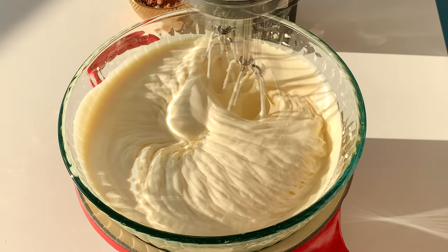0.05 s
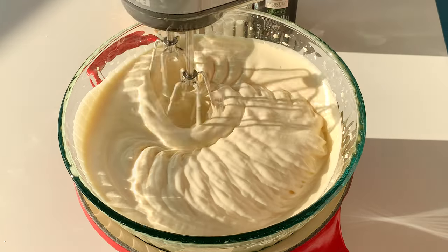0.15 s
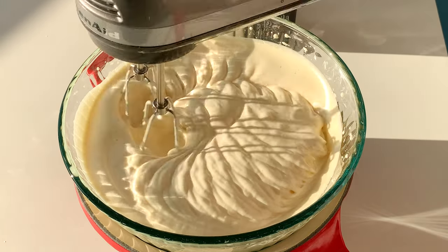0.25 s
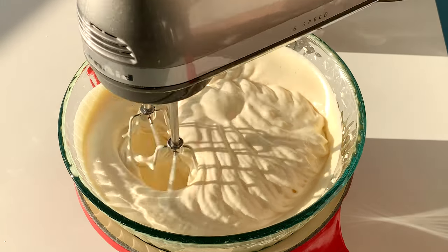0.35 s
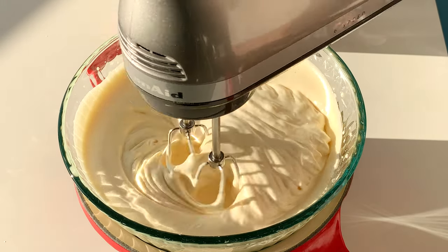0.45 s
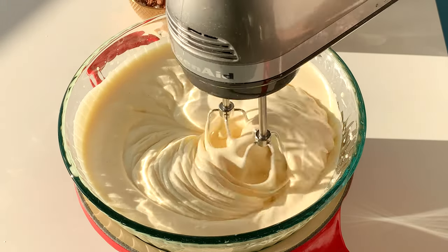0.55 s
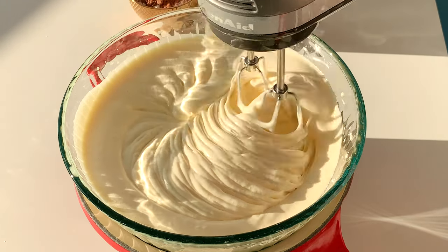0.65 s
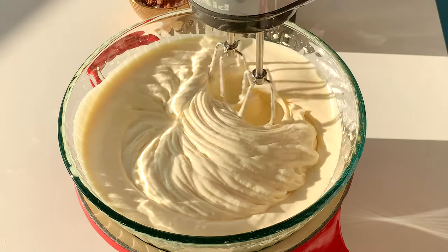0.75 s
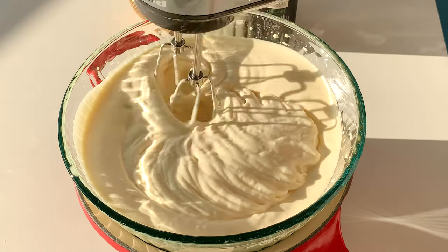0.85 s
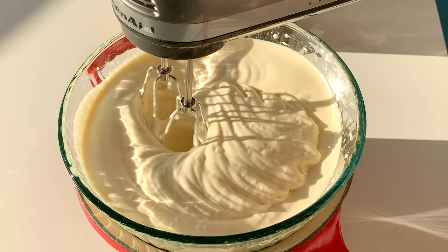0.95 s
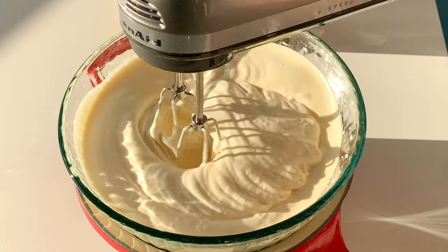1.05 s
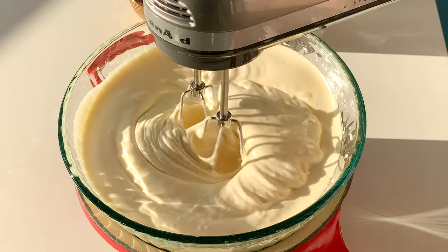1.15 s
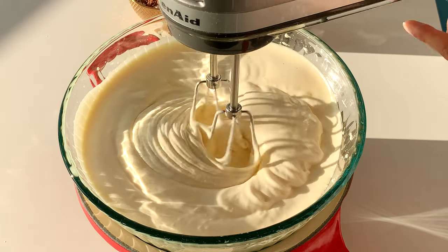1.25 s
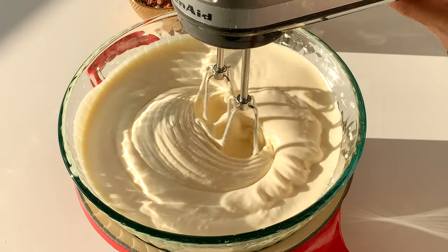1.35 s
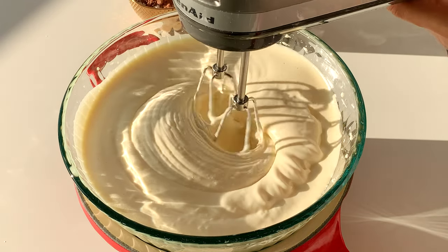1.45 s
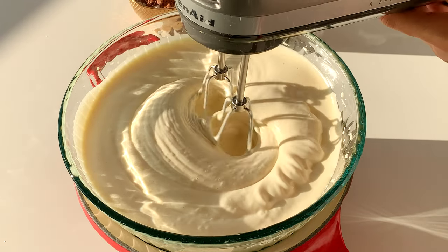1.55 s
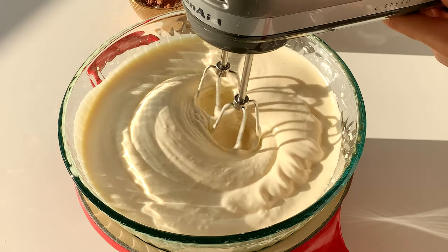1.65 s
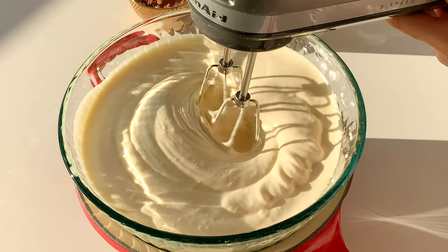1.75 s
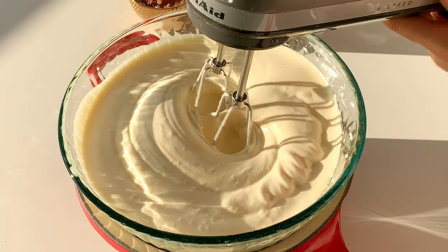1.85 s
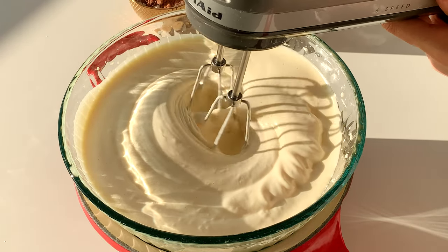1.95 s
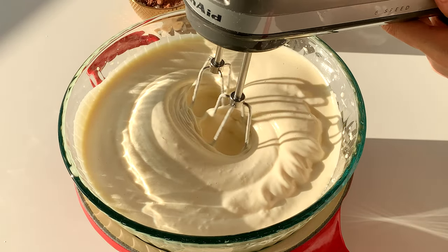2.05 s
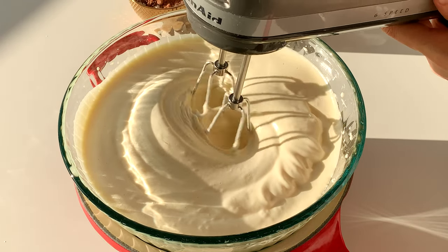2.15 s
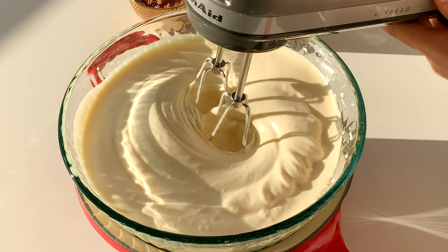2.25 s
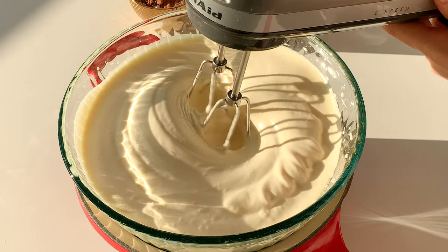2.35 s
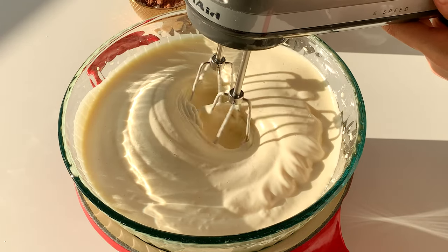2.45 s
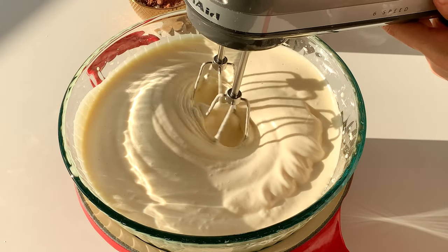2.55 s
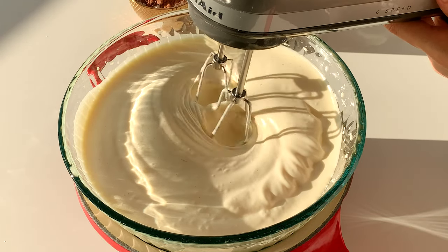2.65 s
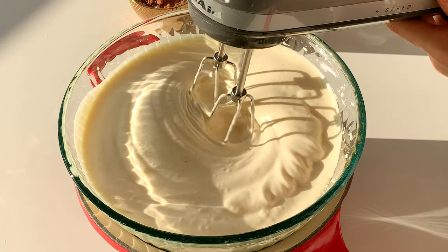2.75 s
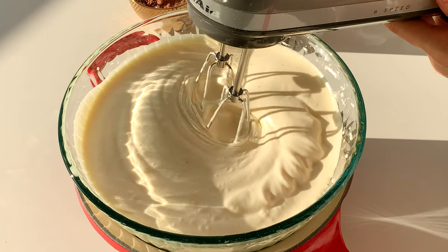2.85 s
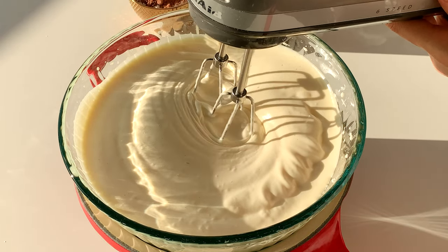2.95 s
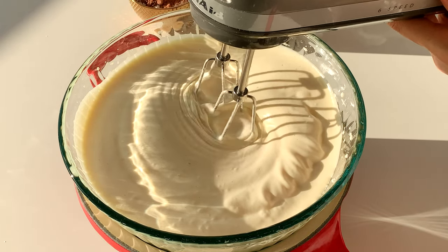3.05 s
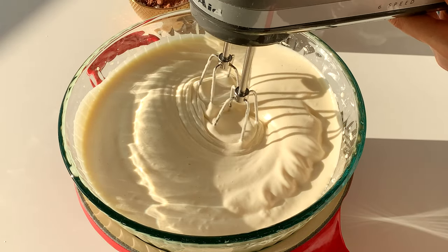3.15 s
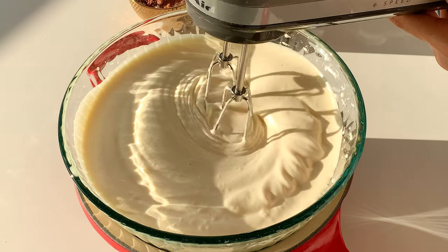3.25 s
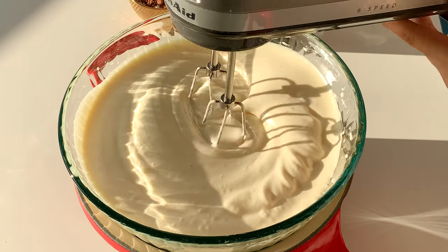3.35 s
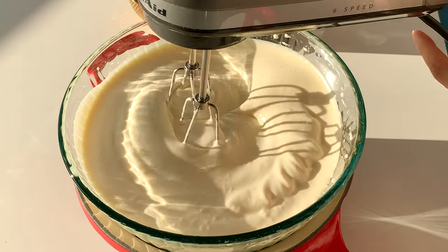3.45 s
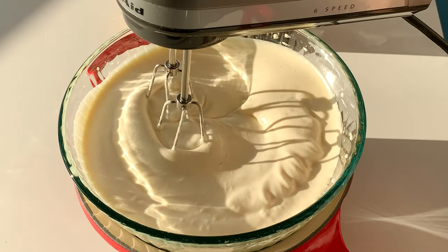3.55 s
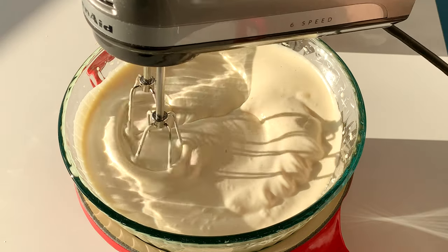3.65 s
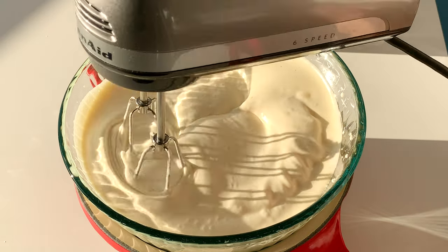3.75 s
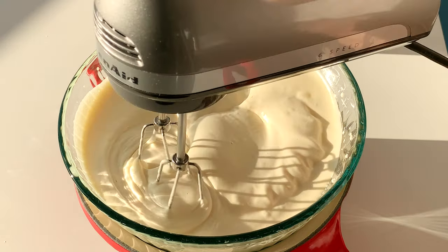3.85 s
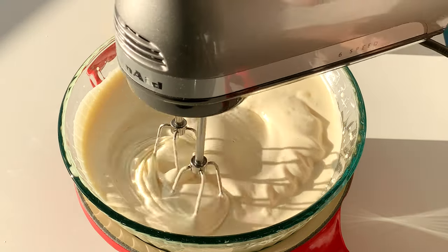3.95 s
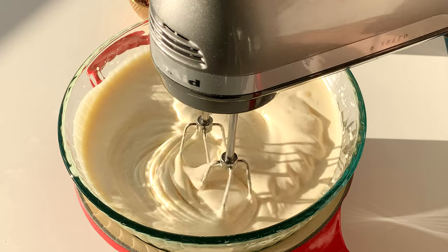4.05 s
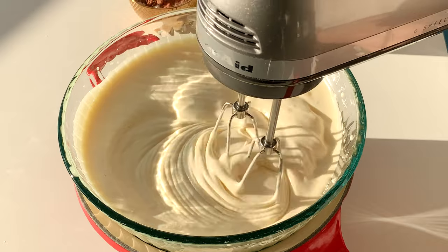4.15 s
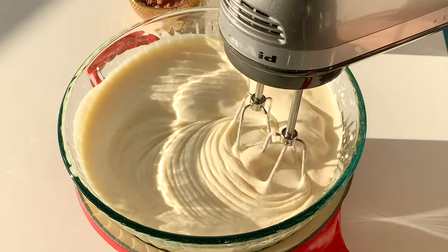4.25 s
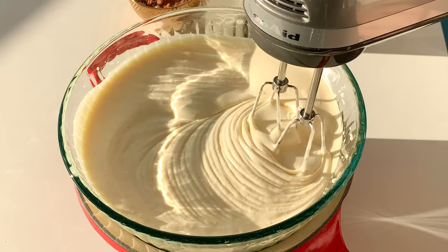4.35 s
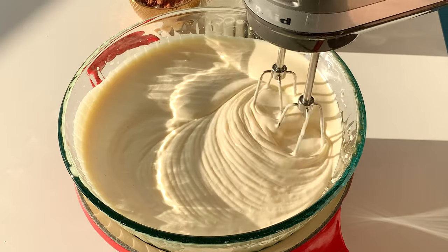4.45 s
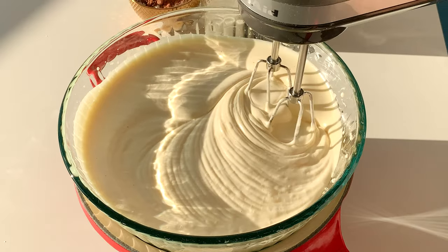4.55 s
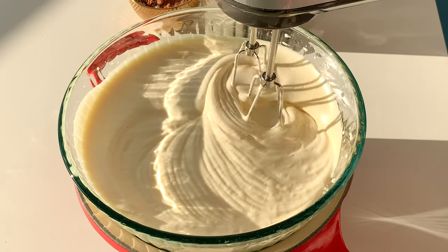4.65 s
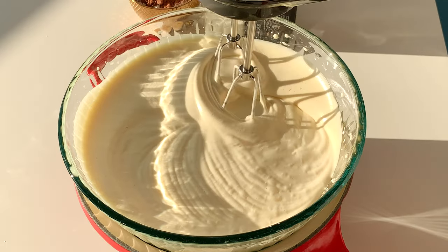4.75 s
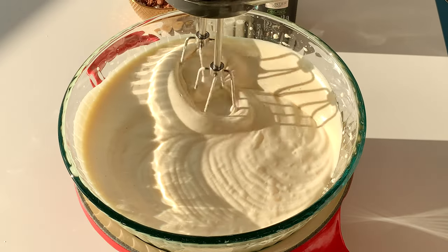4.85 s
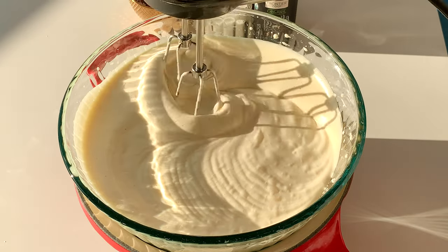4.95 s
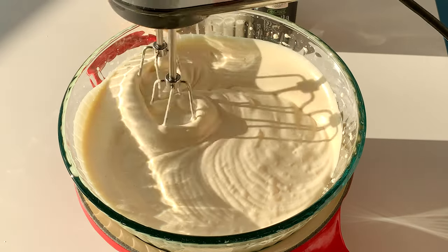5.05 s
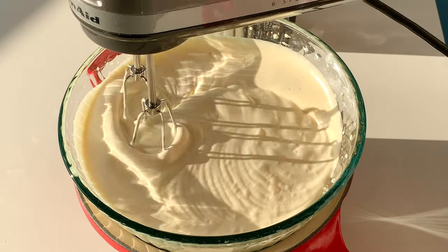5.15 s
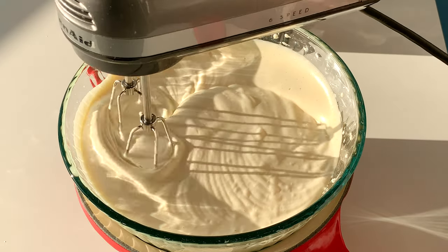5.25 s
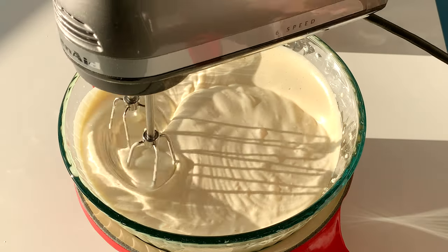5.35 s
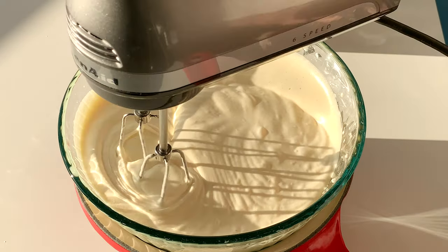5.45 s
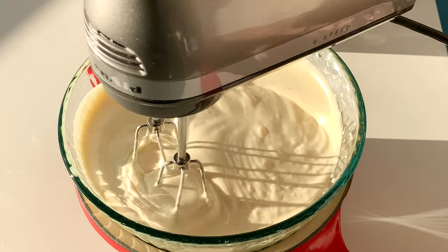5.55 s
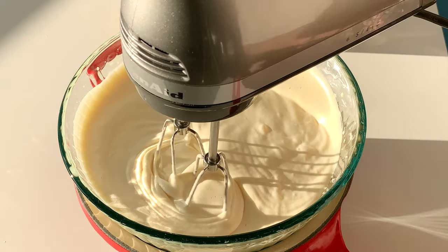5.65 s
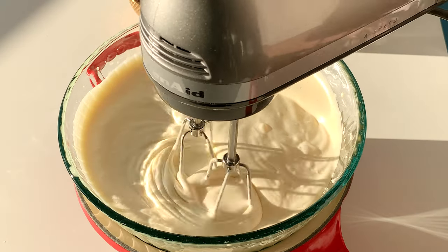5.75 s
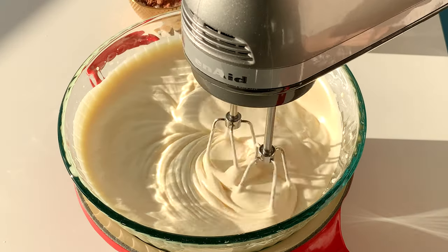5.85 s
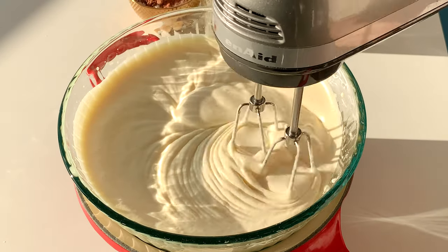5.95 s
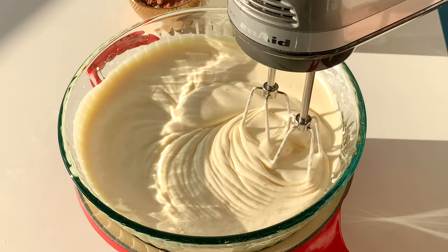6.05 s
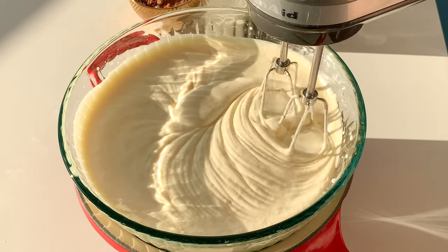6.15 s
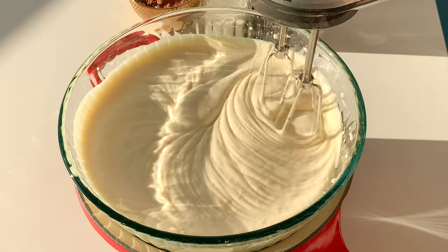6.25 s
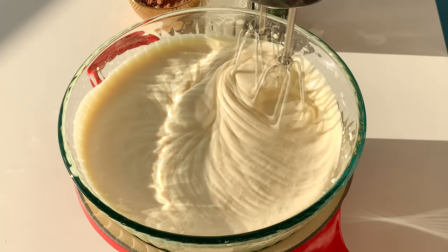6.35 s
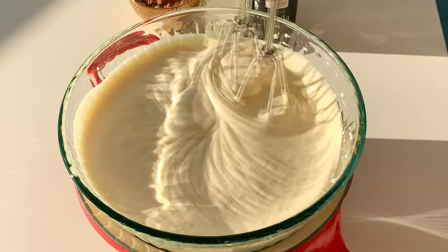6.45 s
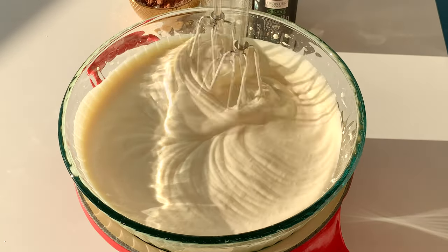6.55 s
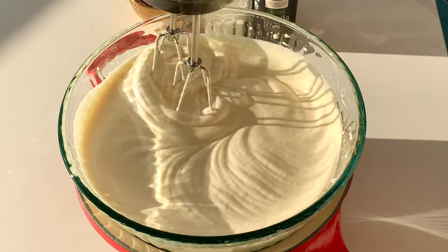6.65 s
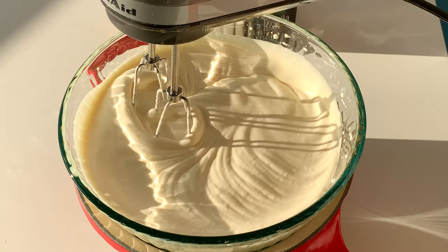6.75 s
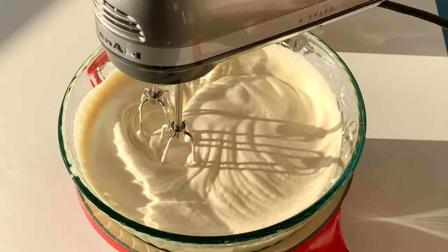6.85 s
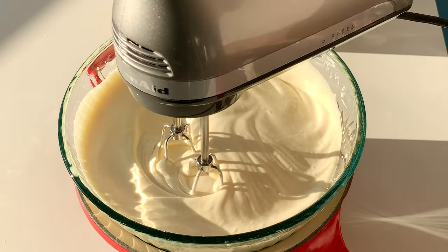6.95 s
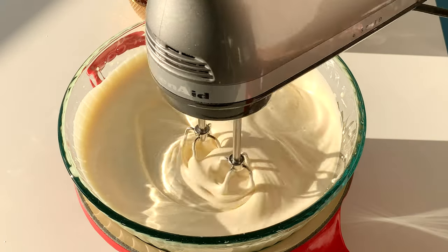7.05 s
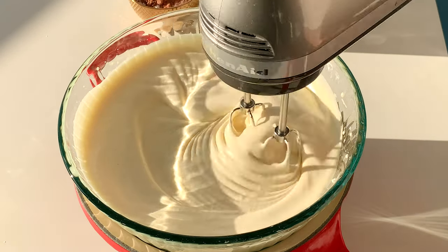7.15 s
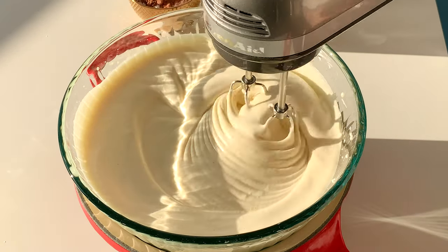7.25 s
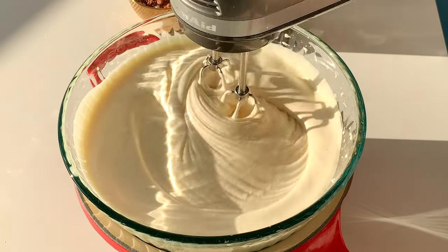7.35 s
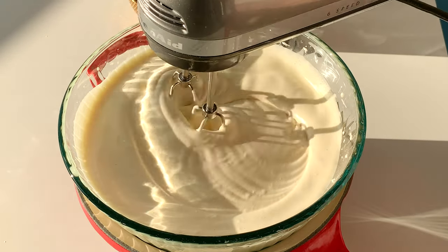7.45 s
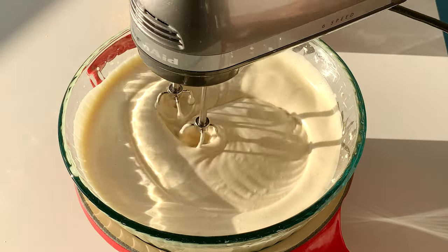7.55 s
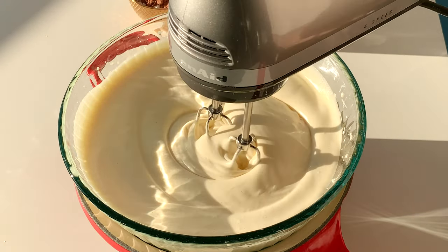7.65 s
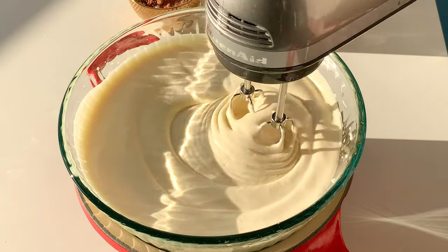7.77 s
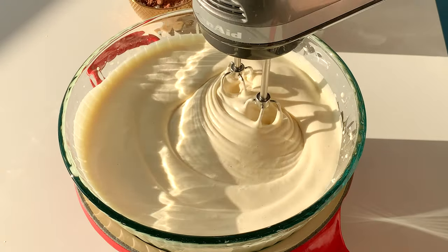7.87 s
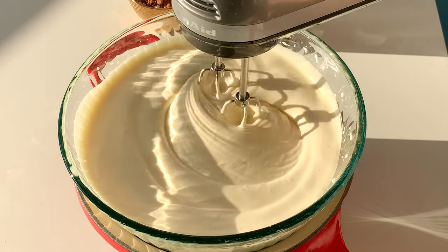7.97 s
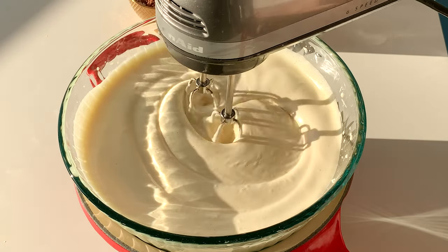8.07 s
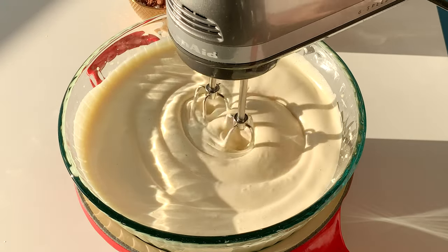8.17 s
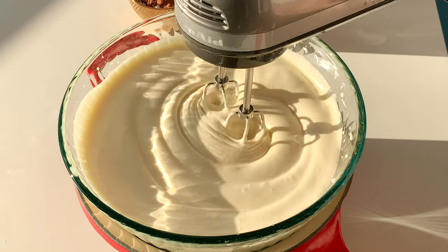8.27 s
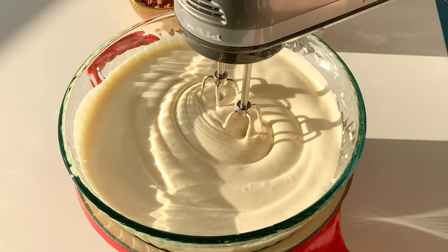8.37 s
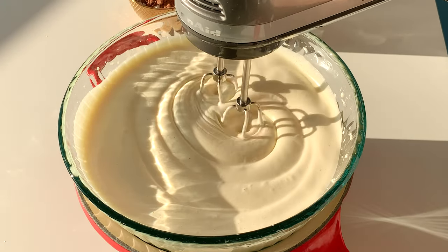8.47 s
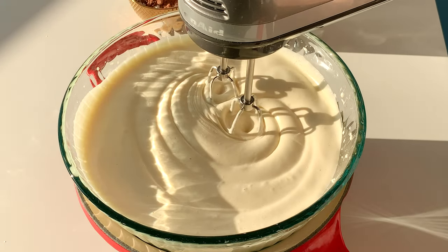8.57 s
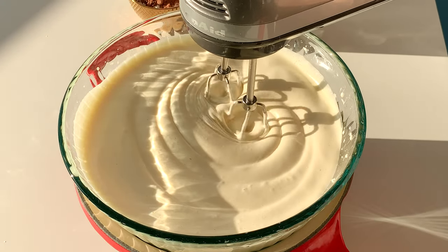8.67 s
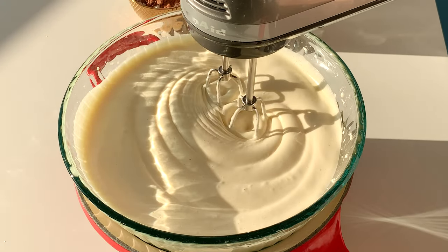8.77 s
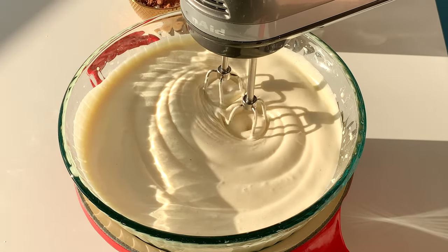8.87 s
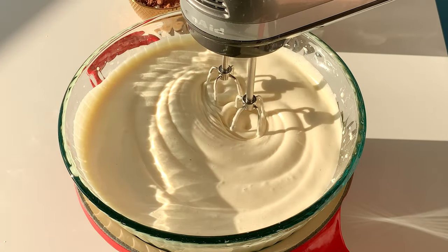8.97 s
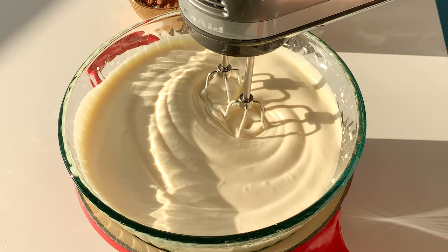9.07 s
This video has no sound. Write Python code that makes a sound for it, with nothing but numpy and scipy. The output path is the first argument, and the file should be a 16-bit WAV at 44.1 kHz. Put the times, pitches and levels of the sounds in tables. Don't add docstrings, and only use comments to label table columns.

```python
import sys
import numpy as np
from scipy import signal
from scipy.fft import rfft, irfft, next_fast_len
from scipy.io import wavfile
from scipy.ndimage import uniform_filter1d, map_coordinates

SR = 44100
rng = np.random.default_rng(int(sys.argv[2]) if len(sys.argv) > 2 else 0)


def wav_record(signal):
    frames = np.transpose(np.atleast_2d(signal))
    bounded = np.clip(frames, -1, 1)
    quanta = np.round(bounded * 32767).astype(np.int16)
    wavfile.write(sys.argv[1], SR, quanta)


def gain_from_db(level_db):
    decades = np.asarray(level_db, float) / 20
    return 10 ** decades


N = 401751
T = np.arange(N) / SR
HUM_HZ = 156.1
BITE_S = 2.711
BEATER_TURNS = 9.78

# start_s, depth [0-1]
DEPTH = [
    (0, 0),
    (2.3, 0.13),
    (3.7, 0.4),
    (5.6, 0.27),
    (6.5, 0.57),
    (6.9, 0.4),
    (7.05, 0.6),
    (7.6, 0.75),
    (8, 0.83),
    (9.11, 0.6),
]
# start_s, thud_db, wire_db
FLOOR_KNOCKS = [(6.9566, -39.5, -39), (6.9813, -46, -41), (6.994, -43.5, -50), (7.1056, -44, -45),
                (7.1226, -41.5, -37), (7.1621, -39.5, -42), (7.2524, -42.5, -41), (7.2839, -45, -51),
                (7.294, -40, -30.5), (7.3581, -41.5, -33), (7.3666, -38, -32), (7.4246, -41, -54),
                (7.7563, -43, -43.5), (7.8455, -43.5, -36), (7.8908, -38, -31), (7.9473, -46.5, -39)]


def unit(x):
    return x / np.sqrt(np.mean(x ** 2) + 1e-20)


def along(points, hz):
    f, v = np.transpose(points)
    return np.interp(np.log(hz + 1), np.log(f + 1), v)


def curves(rows):
    s, *cols = np.transpose(rows)
    return [np.interp(T, s, c) for c in cols]


def wobble(rate):
    coarse = T[::64]
    knots = rng.standard_normal(int(N * rate / SR) + 4)
    return np.interp(T, coarse, map_coordinates(knots, [coarse * rate]))


def filtered(x, response):
    m = next_fast_len(x.shape[-1] + 8192)
    return irfft(rfft(x, m) * response(np.fft.rfftfreq(m, 1 / SR)), m)[..., :x.shape[-1]]


def band(x, lo_hz, hi_hz, order=2):
    return unit(signal.sosfilt(signal.butter(order, [lo_hz, hi_hz], "bandpass", fs=SR, output="sos"), x))


def resonance(hz, centre_hz, width_hz):
    return 1 / (1 + (2 * (hz - centre_hz) / width_hz) ** 2)


def onset(t, rise_s):
    return 1 - np.exp(-t / rise_s)


def decay(t, t60_s):
    return gain_from_db(-60 * t / t60_s)


def add_at(out, start_s, sound):
    out[round(start_s * SR):][:len(sound)] += sound


def gearing():
    # start_s, shaft turns per s
    speed_points = [(0, 259), (2.36, 258.9), (2.4, 247), (2.51, 217.8), (2.59, 203), (2.66, 196),
                    (2.71, 185), (2.8, 160), (2.89, 137.5), (2.94, 130), (2.99, 125), (3.05, 123.4),
                    (3.2, 122.5), (4, 123.3), (4.8, 122.6), (6.2, 123.4), (6.6, 124.6), (9.11, 123.5)]
    gears = [259, 190, 124]
    speed, = curves(speed_points)
    near = np.array([np.interp(speed, gears[::-1], row[::-1]) for row in np.eye(3)])
    jitter = 0.000588 * (1 + near[0]) * wobble(12)
    return np.cumsum(speed * (1 + jitter)) / SR, near


def layer_levels(near):
    # start_s, drive of the motor [dB], aim of the vents at the listener [dB]
    effort = [(0, 2.5, -0.5), (.6, 1, 0), (1.8, -0.5, 0.5), (2.36, -0.5, 1), (2.45, -4, 0), (2.709, -5, -4),
              (2.712, 3.5, 0), (2.82, 1.5, 0), (2.95, -1, 3), (3.3, -1.5, 3), (3.9, -0.5, 4),
              (4.7, -1.5, 3), (5.5, -1, 4.5), (6.4, 2.5, 3), (6.85, 0.5, 3), (8, 1, 2), (9.11, .5, 0.5)]
    controls = np.vstack([near, curves(effort)])
    low_whirr = (-58.5, -59, -58.5, 0.76, 0)
    mid_whirr = (-50, -48.5, -54.5, 0.73, 0.5)
    fan_hiss = (-55.5, -57.5, -60.5, 0.7, 0)
    shaft_tones = (0, 0.5, -1.5, 0.1, 0.9)
    slot_whine = (0, 0.5, 2.6, 0.25, 1.05)
    supply_hum = (-80.5, -88.5, -61.5, 0.5, 0.17)
    rules = (low_whirr, mid_whirr, fan_hiss, shaft_tones, slot_whine, supply_hum)
    return [np.array(rule) @ controls for rule in rules]


def tones(turns, near, tone_db, whine_db):
    # multiple, fast_db, braking_db, slow_db
    orders = [(3, -65.5, -85, -86), (4, -62.5, -70, -70), (5, -68, -92, -85), (6, -61.5, -76, -65.5),
              (7, -85, -85, -71), (8, -59, -66, -66), (9, -75, -85, -85), (10, -72, -72, -73),
              (11, -74, -70, -74), (12, -66, -63, -68), (13, -85, -85, -72), (14, -72, -75, -75),
              (17, -90, -85, -73), (18, -95, -85, -73), (24, -82, -58, -70.5), (27, -80, -90, -77),
              (30, -84, -90, -78), (36, -84, -79, -69.5), (45, -99, -99, -81), (48, -99, -90, -76),
              (58, -99, -99, -81), (72, -99, -99, -86), (74, -99, -99, -86), (16, -90, -85, -64.5),
              (22, -99, -99, -78), (38, -99, -99, -82)]
    throb = [.95, .8, .15]
    # start_s, level_db of each beamed multiple
    beam = [(0, 0, -2, 0, 0, 0, 1, -20), (1.1, 0, 1, 0, 0, 0, 0, -20), (1.9, -6, 2, 0, 0, 0, 0, -20),
            (2.4, -2, -3, -3, 0, 0, -3, -20), (2.7, 0, -1, -10, 0, 0, -2, -20),
            (2.77, 0, 0, 0, 0, -4, 0, -20), (2.9, 0, 0, 4, -5, -8, 0, -20),
            (2.97, 0, 0, -6, 1, -10, 2, -20), (3.25, 0, 0, -3, 2, -6, 3, -12),
            (3.7, 0, 0, -3, -1, -1, 2, -8), (4.1, 0, 0, -2, -1, -1, -2, 1), (4.6, 0, 0, -2, -1, -1, -2, -8),
            (5.3, 0, 0, -1, -4, -4, -3, -10), (5.9, 0, 0, 0, -3, -3, -3, 3), (6.8, 0, 0, -4, -1, 0, 1, -8),
            (7.5, 0, -1, -3, -2, -3, 0, -8), (8.4, 0, -3, 0, -4, -3, -4, -3),
            (9.11, 0, -3, -3, -3, -4, -4, -3)]
    beamed = [4, 8, 24, 36, 48, 12, 16]
    bite_db = {4: 4, 5: 14, 6: 2.5, 7: -10, 8: -5, 10: 3, 11: 4, 12: 3, 13: 12}

    step = slice(None, None, 32)
    t, near = T[step], near[:, step]
    speed = np.gradient(turns[step], t)
    beater = 2 * np.pi * turns[step] / BEATER_TURNS
    loaded = np.array(throb) @ near * np.clip(0.6 + t / 3, 0, 1)
    bite = (t > BITE_S) * np.clip((speed - 125) / 10, 0, 1) * (1 - near[0])
    beams = {k: curve[step] for k, curve in zip(beamed, curves(beam))}
    out = np.zeros(N)
    for k, *levels in orders:
        depth = .9 if k == 16 else loaded * (.3 if k > 8.5 else 1)
        a, b, c = rng.uniform(0, 2 * np.pi, size=3)
        lag = .1 * a + np.pi * (k < 5.5)
        rock = 1 + depth * np.cos(beater + lag) + .3 * depth * np.cos(2 * beater + b)
        drift_db = .7 if k in beams or k == 12 else 2.4 - 1.6 * near[0]
        level_db = drift_db * map_coordinates(rng.standard_normal(size=60), [t * 5.5])
        level_db += 18 * near[1] * resonance(k * speed, 804, 170)
        level_db += 10 * near[1] * resonance(k * speed, 1720, 450)
        flutter = map_coordinates(rng.standard_normal(size=400), [t * 40]) * (k > 20)
        level_db += bite_db.get(k, 0) * bite + beams.get(k, 0) + 1.4 * flutter
        level_db += (whine_db if k % 24 == 0 else tone_db)[step]
        size = rock * gain_from_db(np.array(levels) @ near + level_db)
        sway = .6 * (-1 if k == 8 else .8) * depth * np.sin(beater + lag) + .55 * flutter
        phase = 2 * np.pi * k * turns + c + np.interp(T, t, sway)
        out += np.interp(T, t, size) * np.sin(phase)
    return np.sqrt(2) * out


def hum(db):
    # multiple, level_db
    harmonics = [(1, -20), (2, -18), (3, -10), (4, 0), (5, -5), (6, -10), (8, -11)]
    out = np.zeros(N)
    for k, level in harmonics:
        out += gain_from_db(db + level + 1.0 + 2.7 * wobble(6)) * np.sin(2 * np.pi * k * HUM_HZ * T + k * k)
    return out


def airy(x):
    hz, _, z = signal.stft(x, SR, nperseg=512)
    field = uniform_filter1d(rng.standard_normal(z.shape), size=5, axis=0)
    field = unit(uniform_filter1d(field, size=70, axis=1))
    share = np.clip(hz / 7000 - .6, .07, 1)[:, None]
    return signal.istft(z * gain_from_db(2.3 * field * share), SR, nperseg=512)[1][:N]


def whirr(turns, near, low_db, mid_db, high_db):
    # pitch_hz, width_hz, level_db
    housing = [(810, 590, 2.5), (961, 130, 5.5), (1590, 330, 6.5), (1870, 240, 4), (3690, 190, -1),
               (7020, 550, 4), (8900, 210, -1)]
    # frequency_hz, level [dB per Hz]
    fast_spectrum = [(40, -46), (150, -24.5), (550, -13.5), (800, -5), (1150, -17), (1600, -13), (2100, -6),
                     (2500, -11.5), (3700, -6), (4600, -14), (7200, -16.5), (8000, -23), (16000, -35)]
    # frequency_hz, level [dB per Hz]
    slow_spectrum = [(40, -38), (350, -19.5), (500, -16.5), (800, -7), (1000, -18.5), (1120, -20),
                     (1300, -13), (2100, -11), (2550, -17.5), (3500, -13.5), (4400, -19.5), (4800, -31),
                     (5300, -20.5), (6000, -22), (8500, -30.5), (16000, -39.5)]

    size = next_fast_len(N)
    hz = np.fft.rfftfreq(size, 1 / SR)
    shell = gain_from_db(sum(db * resonance(hz, centre, width) for centre, width, db in housing))
    angle = 2 * np.pi * turns
    pulse = 1 + 0.047 * np.cos(angle)
    pulse += (0.022 + 0.096 * near[0]) * np.cos(angle / 12.0)
    pulse += 0.11 * np.cos(2 * angle / 11.0)
    rough_spot = unit(np.diff(np.floor(turns), prepend=0))
    noise = pulse * rng.standard_normal(N) * gain_from_db(1.2 * wobble(14))
    raw = rfft(noise + .08 * rough_spot, size)
    fast = np.clip(near[0] + .5 * near[1] * (T < BITE_S), 0, 1)
    out = np.zeros(N)
    layers = [(low_db - 0.5, 0, 1200), (mid_db - 3.0, 1200, 4500), (high_db - 3.0, 4500, SR)]
    for db, lo, hi in layers:
        cut = shell * (hz >= lo) * (hz < hi) * raw
        quick, slow = [unit(irfft(cut * gain_from_db(along(spectrum, hz)), size)[:N])
                       for spectrum in (fast_spectrum, slow_spectrum)]
        out += gain_from_db(db + .4 * wobble(4)) * (fast * quick + (1 - fast) * slow)
    depth, = curves(DEPTH)
    return airy(out - 0.72 * depth ** 3 * filtered(out, lambda f: resonance(f, 1530, 500)))


def off_the_bowl(x):
    delay_s = .0008 * (1 + .07 * wobble(1.2))
    return x + .3 * np.interp(T - delay_s, T, x)


def batter(turns, near):
    # start_s, level_db
    nudges = [
        (0, -76),
        (1.176, -66),
        (1.234, -63),
    ]
    # start_s, peak level_db, pitch_hz
    plops = [(6.96, -42, 572), (6.997, -40.5, 563), (7.039, -44, 480), (7.252, -43, 574), (7.294, -38, 587),
             (7.364, -54, 530), (7.426, -29.5, 560), (7.504, -39, 524), (7.542, -41, 560),
             (7.593, -44, 514), (7.666, -51, 510), (7.842, -32.5, 580), (7.89, -34.5, 510),
             (7.923, -40, 573), (7.95, -34.5, 502), (8.163, -49, 563), (8.199, -43, 587), (8.462, -47, 594),
             (8.508, -43, 564), (8.535, -43, 522), (8.616, -46, 554), (8.635, -50, 526), (8.705, -47, 542),
             (8.794, -49, 606), (8.837, -45, 520), (8.87, -47, 540), (8.965, -56, 600), (8.586, -44, 550),
             (8.667, -36.5, 557), (8.746, -39.5, 582), (8.911, -42, 564), (8.947, -44, 548),
             (9.006, -36.5, 575), (9.09, -40, 528)]
    # start_s, peak level_db, pitch_hz, length_s
    sings = [(7.97, -50, 491, 0.115), (8.21, -44.5, 495, 0.054), (8.285, -42.5, 510, 0.049),
             (8.355, -43.5, 500, 0.053), (8.44, -48, 502, 0.059)]

    depth, = curves(DEPTH)
    hollow_db = -88.5 + (-44.5 + 88.5) * depth
    bump_db = -99 + (-63 + 99) * depth
    rumble_db = -103 + (-69.5 + 103) * depth
    slap = gain_from_db(1.5 * wobble(22) + 1.5 * np.cos(2 * np.pi * turns / BEATER_TURNS))
    out = gain_from_db(hollow_db - 3.5) * unit(slap * band(rng.standard_normal(N), 478, 581))
    out += gain_from_db(bump_db + 12.5 * near[0] - 0.5) * band(rng.standard_normal(N), 147.6, 159.0, order=1)
    shifted = T > nudges[1][0]
    out += gain_from_db(-83.5) * near[0] * shifted * band(rng.standard_normal(N), 200, 203, order=1)
    out += gain_from_db(-82 + 2 * wobble(2.8)) * near[0] * np.sin(2 * np.pi * HUM_HZ * T)
    out += gain_from_db(rumble_db + 2.6 * wobble(6.7)) * band(rng.standard_normal(N), 19, 105, order=1)

    out, t = np.pad(out, (0, SR)), np.arange(SR // 6) / SR
    swell = onset(t, 0.0013) * decay(t, 0.091)
    thump = gain_from_db(5.0) * onset(t, 0.0044) * decay(t, 0.13) * np.sin(2 * np.pi * 152 * t)
    for s, db, hz in plops:
        sway, second = rng.normal(size=2)
        plop = np.sin(2 * np.pi * hz * t * (1 + 0.35 * sway * t))
        plop += 0.18 * np.sin(2 * np.pi * hz * (1.0 + 0.14 * second) * t)
        add_at(out, s, gain_from_db(db) * (swell * plop + gain_from_db(-27.5) * thump))
    for s, db, hz, length in sings:
        arch = np.sin(np.pi * np.clip(t / length, 0, 1)) ** 0.95
        add_at(out, s, gain_from_db(db) * arch * np.sin(2 * np.pi * hz * t))
    for s, db in nudges:
        add_at(out, s, gain_from_db(db + 1.0) * onset(t, .008) * decay(t, 0.23) * np.sin(2 * np.pi * 127 * t))
    for s, thud_db, _ in FLOOR_KNOCKS:
        add_at(out, s, gain_from_db(thud_db - 15) * thump)
    return out[:N]


def contacts():
    # start_s, wire_db, lower and upper glass ring level_db
    wall_clinks = [(0.119, -43.5, -52, -66), (0.8355, -35, -46, -62.5), (0.8729, -40.5, -46, -63),
                   (3.8397, -32.5, -46, -68), (4.2737, -47, -47, -65), (4.2951, -48, -46, -60),
                   (4.3321, -32.5, -41, -51), (4.4174, -38.5, -45, -67), (4.775, -36.5, -46, -68),
                   (4.8524, -33, -44, -65), (4.9262, -29, -43, -54), (5.0624, -39, -43, -53),
                   (5.0769, -27.5, -46, -53), (5.9923, -30.5, -48, -69), (6.0786, -39, -40, -51),
                   (6.0975, -48.5, -37.5, -61), (6.1564, -31, -37, -65), (6.2417, -34, -43, -46),
                   (6.2694, -44, -44, -56), (6.2851, -32.5, -41, -42), (6.4343, -31, -42, -39.5),
                   (6.4604, -33, -55, -38), (6.4774, -36.5, -52, -44), (6.4951, -37.5, -40, -43),
                   (6.5121, -32, -39, -39), (6.6273, -38.5, -58, -53), (6.6438, -34.5, -41, -60),
                   (6.6578, -30.5, -37, -43)]
    # start_s, wire_db
    grazes = [(0.0829, -48), (5.9145, -49), (5.9566, -51), (6.2594, -47), (6.368, -56), (6.4214, -41.5),
              (7.0144, -54), (7.712, -52), (7.838, -44), (7.923, -47), (8.97, -47)]
    # level_db of the loops near 10, 11.6, 13 and 14.5 kHz
    struck_wires = [(0, 9, 0, 9), (-4, -1, -1, -1), (-8, 6, 2, -8), (-9, 8, 0, -21), (2, 1, 10, 3),
                    (0, 1, 3, 6), (-1, 10, 0, 1), (-7, 1, -3, -8), (-6, 7, 1, 3), (-6, 1, 4, 0),
                    (3, -1, 1, 8), (-9, 0, -2, 4), (-5, 1, -1, -1), (-8, 8, 4, 0), (1, 3, -1, 0),
                    (11, 0, 8, 4), (4, -8, 4, 1), (2, -5, -3, 0), (6, 0, -1, 4), (3, -9, 1, 7),
                    (-3, -5, 1, 5), (-3, -10, -9, -1), (0, -1, 2, 9), (-8, -4, -5, 6), (-5, 4, -4, 7),
                    (0, 0, -7, 7), (-1, 0, 3, 7), (4, 4, 7, 4), (1, 3, -5, 0), (2, -9, -13, -9),
                    (10, 11, -4, 0), (2, 1, -3, -1), (4, -6, -7, 3), (3, 1, -3, -3), (-2, 12, -8, -8),
                    (5, 2, 0, 3), (-2, -2, -6, -3), (3, -9, -7, -4), (1, -5, -7, -1), (10, 5, 0, -2),
                    (-1, 10, -4, -9), (-4, -3, -9, -9), (-8, 6, -9, -6), (0, 6, -16, -12)]
    struck_wall = [(-3, -3), (-4.5, 0), (-4, 5), (4.5, -2.5), (3, 6.5), (12, 0), (0.5, -3), (1.5, 1),
                   (-6, -2), (-7, 1), (-3.5, 0.5), (-6, 6), (-3, 3.5), (0, -5), (7, -3), (12, 3), (1, 0.5),
                   (0, -1), (12, -5), (5, -1), (8.5, 0), (-2, -1), (6, 4), (-6, -1), (-3, 4), (-6, -8),
                   (-2, -1), (-2, 3)]
    long_loop = [0, 0, -4, 9, -2, 0, 1, -3, -2, 0, 3, 19, 3, -3, -3, 2, 9, 2, 0, -1, -2, -3, 1, -5, -2, 0,
                 4, 3]

    touches = wall_clinks + [(s, db, db - 17, db - 17) for s, db in grazes]
    rows = []
    for s, wire_db, *glass in touches:
        over_db = wire_db + 35
        rows.append((s, wire_db, -40.5 + 0.89 * over_db, -41 + 0.98 * over_db, *glass))
    for s, thud_db, wire_db in FLOOR_KNOCKS:
        rows.append((s, wire_db - 0.5, thud_db, thud_db - 2, thud_db - 20, thud_db - 20))
    unlisted = len(grazes) + len(FLOOR_KNOCKS)
    wires = np.insert(np.array(struck_wires, float), [len(wall_clinks)] * len(grazes), 0, axis=0)
    wires = np.c_[wires, np.pad(long_loop, (0, unlisted), constant_values=-16)]
    halves = np.pad(np.array(struck_wall, float), ((0, unlisted), (0, 0)))
    return zip(rows, wires, halves)


def ring(modes, t, scatter_db, struck_db=0):
    hz, db, t60 = np.transpose(modes)[:, :, None]
    chance = rng.standard_normal((3, len(modes), 1))
    size = gain_from_db(db + np.reshape(struck_db, (-1, 1)) + scatter_db * chance[0]) * decay(t, t60)
    wave = np.sin(2 * np.pi * hz * (1 + 0.0044 * chance[1]) * t + 9 * chance[2])
    return (size * wave).sum(0) / np.sqrt(2 * np.sum(gain_from_db(db) ** 2))


def clinks():
    # pitch_hz, level_db, t60_s
    thud_modes = [(563, -6.5, 0.16), (618, -1, 0.085), (768, 1, 0.046), (839, 1, 0.073), (951, -4, 0.095)]
    # pitch_hz, level_db, t60_s
    body_modes = [(1295, 5.5, 0.081), (1638, 10.5, 0.064), (2034, 20.5, 0.021), (2624, 8, 0.053),
                  (3660, -8, 0.056), (4260, -5, 0.53), (4340, -35.5, 0.079)]
    # pitch_hz, t60_s
    glass_modes = [(5890, 0.062), (7890, 0.092)]
    # pitch_hz, level_db, t60_s
    wire_modes = [(9670, -5, .07), (10150, -3, .09), (10500, -3, .08), (10880, -3, .12), (11600, -4, .08),
                  (12750, -1.5, .09), (12950, 3, .12), (13760, -6, .06), (14480, -1, .08), (15400, -7, .06)]
    loop_of_mode, half_of_mode = [0, 0, 0, 4, 1, 2, 2, 3, 3, 3], [0, 0, 1, 1, 1]

    out, t = np.zeros(N + SR), np.arange(SR // 5) / SR
    edges = [(130, 460), (400, 1170), (1100, 5530), (4500, 8800)]
    rubs = np.array([band(rng.standard_normal(N + SR), lo, hi) for lo, hi in edges])
    chatter = band(rng.standard_normal(N + SR), 26, 190, order=1)
    skid = onset(t, np.array([[.004], [.003], [.002], [.001]]))
    skid = skid * decay(t, np.array([[.12], [.07], [.055], [.045]]))
    wire_fall = 0.27 + 1.32 * decay(t, 0.053)
    for (s, wire_db, thud_db, body_db, *glass), wires, halves in contacts():
        at = slice(round(s * SR), round(s * SR) + len(t))
        scrape_db = [thud_db - 22.0, thud_db - 3.0 + halves.mean(),
                     body_db + 1.5, wire_db - 14 + wires[:4].min() / 2]
        hit = gain_from_db(scrape_db) @ (skid * rubs[:, at])
        thud = ring(thud_modes, t, scatter_db=2.0, struck_db=halves[half_of_mode])
        hit += gain_from_db(thud_db + 5.0) * onset(t, 0.0028) * thud
        hit += gain_from_db(body_db + 3.5) * onset(t, 0.00048) * ring(body_modes, t, scatter_db=3.5)
        wire = ring(wire_modes, t, scatter_db=1.5, struck_db=wires[loop_of_mode])
        wire = wire * (0.89 + .5 * chatter[at]) * wire_fall
        hit += gain_from_db(wire_db - 5.5) * onset(t, 0.00078) * wire
        for (hz, t60), db in zip(glass_modes, glass):
            tone = np.sin(2 * np.pi * hz * t + 0.72 * chatter[at])
            hit += gain_from_db(db) * decay(t, t60) * onset(t, 0.0005) * tone
        out[at] += hit
    out[:len(t)] += gain_from_db(-40) * (t < 0.002) * band(rng.standard_normal(len(t)), 200, 10000, order=1)
    return out[:N]


def button():
    # start_s, snap level_db, body level_db
    snaps = [
        (2.37, -32.5, -40),
        (2.3804, -42, -46),
        (2.4174, -47, -61),
        (2.6691, -32.5, -44),
        (2.7044, -38, -59),
    ]
    out, t = np.zeros(N), np.arange(SR // 20) / SR
    for s, db, body_db in snaps:
        snap = band(rng.standard_normal(len(t)), 4000, 18000)
        snap *= gain_from_db(db - 0.5) * decay(t, 0.011) * (1 - np.exp(-(t / 0.0011) ** 2))
        body = band(rng.standard_normal(len(t)), 1700, 5800)
        body *= gain_from_db(body_db + 1.0) * decay(t, 0.023) * onset(t, .0012)
        add_at(out, s, snap + body)
    return out


def kitchen(x):
    # frequency_hz, t60_s
    room_t60 = [(200, 0.079), (2000, 0.12), (12000, 0.34)]
    hz, t, z = signal.stft(rng.standard_normal((2, SR // 3)), SR, nperseg=256)
    tail = signal.istft(z * decay(t, along(room_t60, hz)[:, None]), SR, nperseg=256)[1]
    tail = tail / np.linalg.norm(tail[0])
    late = np.pad(x, (150, 0))[None]
    return signal.fftconvolve(late, tail, axes=1)[:, :N]


def scene():
    # frequency_hz, side minus mid level_db
    spread = [(30, -30), (60, -7), (130, -15), (450, -17.5), (1000, -20), (4000, -21), (7500, -27.5),
              (11000, -20), (14000, -32)]
    # frequency_hz, left minus right level_db
    lean = [(125, 0), (300, -1.7), (700, -0.5), (4000, -0.5), (8000, 2.25)]

    turns, near = gearing()
    low_db, mid_db, high_db, tone_db, whine_db, hum_db = layer_levels(near)
    steady = tones(turns, near, tone_db, whine_db) + hum(hum_db)
    steady += off_the_bowl(whirr(turns, near, low_db, mid_db, high_db))
    steady += batter(turns, near)
    hits = clinks() + button()
    wet_mid, wet_side = kitchen(steady + hits)
    mid = steady + hits + gain_from_db(-15.0) * wet_mid
    wall = gain_from_db(-15.0) * filtered(hits, lambda f: np.clip(f / 9000, 0, 1) * np.sin(f / 420) * 1j)
    side = filtered(wet_side, lambda f: gain_from_db(along(spread, f) + 5.0)) + wall
    pair = np.array([mid + side, mid - side])
    return filtered(pair, lambda f: gain_from_db(np.outer([.5, -.5], along(lean, f))))


def top_cut(x):
    return signal.sosfilt(signal.butter(12, 16520, fs=SR, output="sos"), x)


def record(dry):
    mix = filtered(dry, lambda f: gain_from_db(-34 * (f > 15850)))
    return top_cut(mix)


dry = scene()
out = record(dry)
wav_record(out)
```